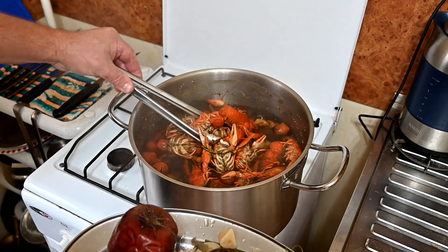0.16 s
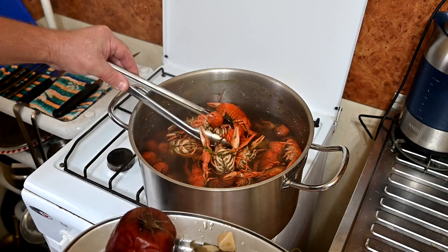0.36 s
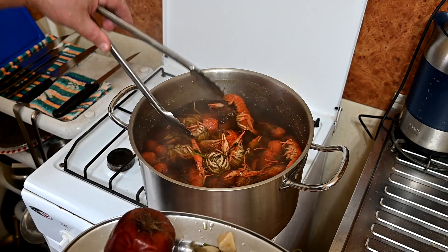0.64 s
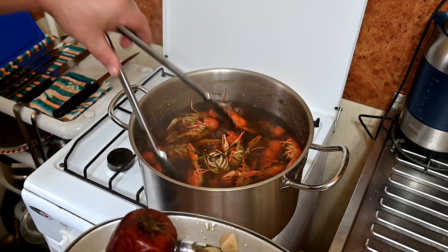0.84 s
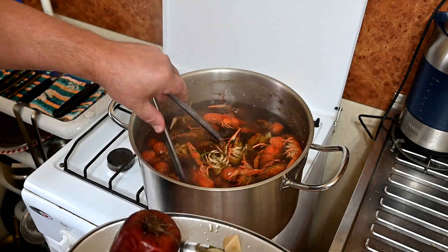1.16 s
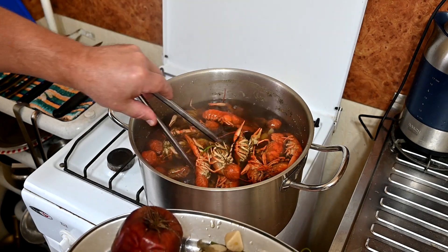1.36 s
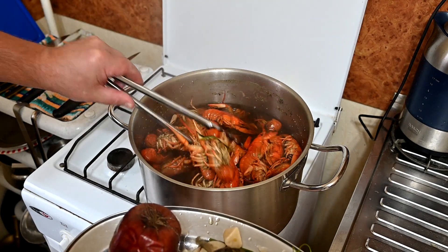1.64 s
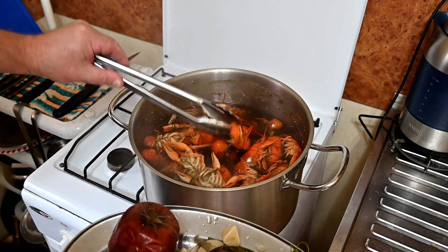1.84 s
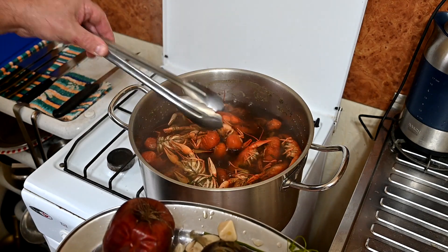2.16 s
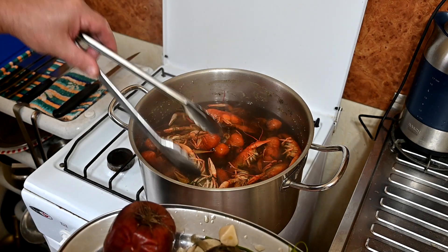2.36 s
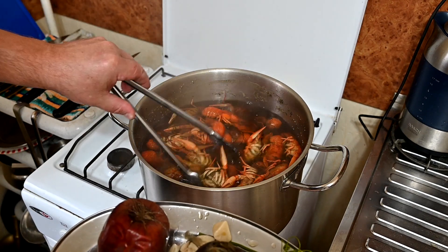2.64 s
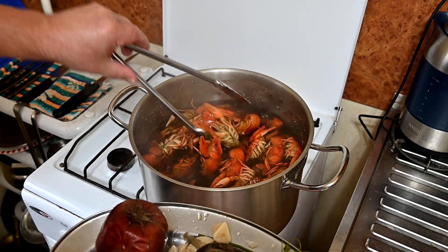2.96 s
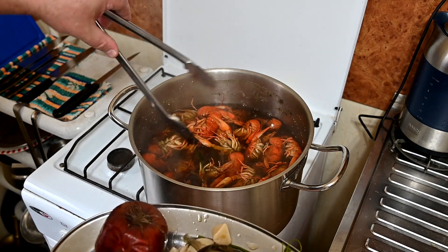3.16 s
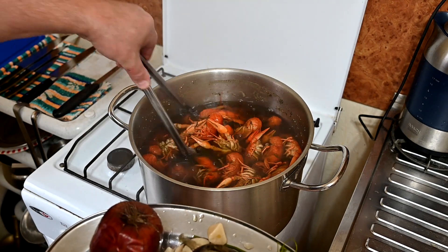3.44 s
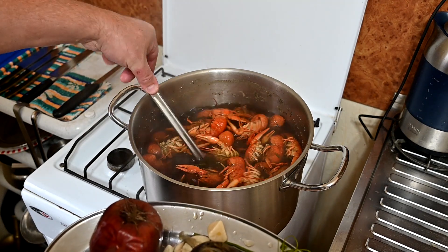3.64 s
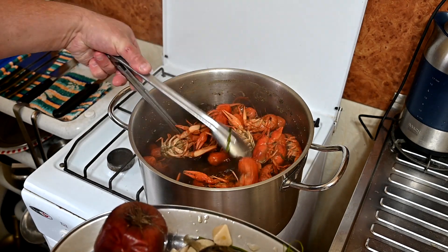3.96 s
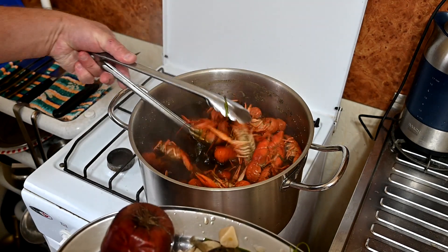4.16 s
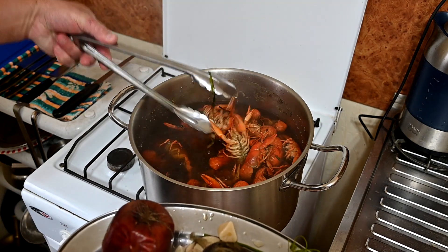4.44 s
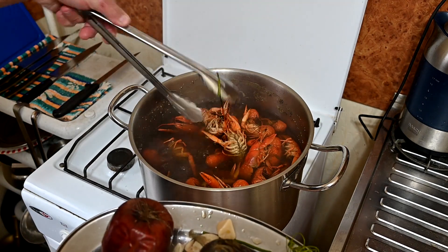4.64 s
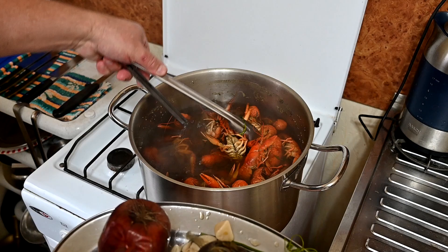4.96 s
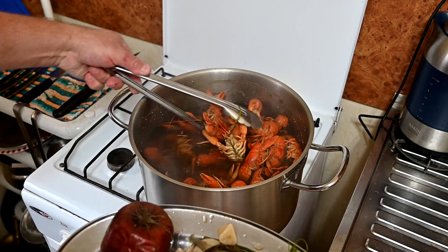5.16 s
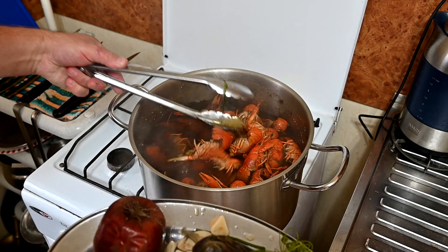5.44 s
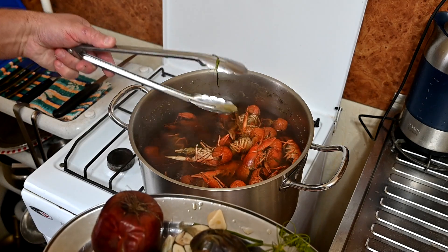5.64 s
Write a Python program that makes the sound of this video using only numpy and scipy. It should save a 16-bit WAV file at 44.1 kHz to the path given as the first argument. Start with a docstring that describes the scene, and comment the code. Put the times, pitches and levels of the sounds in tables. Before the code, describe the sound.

Close, wet crackling and clicking of crayfish shells stirred with metal tongs, broken by sloshing broth and sharp knocks on a steel pot.

```python
"""In a small kitchen, steel tongs fish boiled crayfish out of a big steel pot of broth.
Tongs and pot are sums of decaying modes struck by chattering contact; skids and clicks are noise bursts.
Crackling shells, squelching flesh and sloshing broth are swarms of tiny decaying tones under slow gains.
Bubbles and drips are gliding tones; the air in the pot and the stove under it are resonances driven by noise.
Echoes of the pot's walls and of the kitchen follow, over faint rumble and hiss."""
import sys
import numpy as np
from scipy import signal
from scipy.fft import rfft, irfft, next_fast_len
from scipy.io import wavfile
from scipy.ndimage import uniform_filter1d

SR = 44100
rng = np.random.default_rng(int(sys.argv[2]) if len(sys.argv) > 2 else 0)


def pcm_store(signal):
    """Save signal as 16-bit PCM."""
    levels = np.round(np.clip(np.atleast_2d(signal), -1, 1) * 32767)
    wavfile.write(sys.argv[1], SR, levels.astype(np.int16).T)


N = 256220
TIME = np.arange(N) / SR
GRAIN_TIME = TIME[:4096]
SLOW_TIME = np.arange(0, N / SR, .001)  # gains are drawn in steps of 1 ms

# Tongs at work in the heap: start [t/s], rise [t/s], length [t/s],
# relative crackle of shells [level/dB], relative wet squelch [level/dB]
STROKES = [(0, 0.0017, 0.18, -41, -41.5), (.405, 0.014, 0.052, -39, -41), (.885, 0.026, 0.26, -28.5, -41),
           (1.11, .01, 0.25, -36, -44), (1.56, 0.029, 0.062, -29, -25.5), (1.66, 0.012, .13, -32, -37),
           (1.825, 0.021, 0.02, -23.5, -27.5), (1.92, 0.023, 0.21, -45, -47.5),
           (2.49, 0.012, 0.55, -37.5, -45.5), (3.22, 0.0099, 0.11, -23, -39.5),
           (3.43, 0.0076, 0.046, -33, -36), (3.55, 0.014, 0.13, -32, -34.5),
           (3.83, 0.014, 0.23, -36, -36.5), (4.1, 0.01, 0.4, -35.5, -41.5), (4.71, 0.018, 0.25, -32.5, -40),
           (5.06, 0.046, 0.31, -35.5, -56), (5.34, 0.032, 0.1, -36.5, -37)]
# Broth pushed aside: start [t/s], rise [t/s], length [t/s],
# relative slosh [level/dB], relative boom of the air in the pot [level/dB]
SLOSHES = [(0, 0.0033, 0.018, -39.5, -42.5), (.3, 0.005, 0.01, -40.5, -52), (.93, 0.023, 0.14, -36.5, -72),
           (1.11, 0.015, 0.062, -25.5, -50), (1.56, 0.019, 0.033, -40.5, -60),
           (1.83, 0.012, 0.023, -44, -93), (2.5, 0.15, 0.34, -43.5, -61),
           (3.215, 0.0088, 0.034, -31.5, -45.5), (3.37, 0.034, 0.21, -41, -51.5),
           (3.565, 0.013, 0.048, -30, -37), (4.1, 0.0057, 0.042, -41.5, -34),
           (4.695, .025, 0.041, -31.5, -34), (5.05, 0.027, 0.044, -31, -38),
           (5.125, 0.019, 0.057, -29.5, -28.5)]
# Tongs dragged along the bottom of the pot: start [t/s], rise [t/s], length [t/s],
# stove top [level/dB], relative boom of the air in the pot [level/dB]
DRAGS = [(3.2, 0.45, 0.52, -44.5, -75), (3.55, .12, 0.32, -50, -46.5), (4.72, .12, 0.48, -54, -56)]
# Clearest snaps of shell: onset [t/s], relative snap [level/dB], relative low part [level/dB]
CLICKS = [(.195, -25.5, 9), (0.434, -26, -10), (.5305, -27.5, -30), (0.7733, -33.5, 2), (1.277, -20.5, -9),
          (1.3014, -19.5, -7), (1.5448, -19.5, 1), (1.569, -18, -2), (2.106, -34, -25), (2.4854, -21, -7),
          (2.7647, -23.5, -3), (2.8337, -19, 1.5), (2.9442, -22, -26), (2.963, -17.5, -8),
          (3.789, -20.5, -2), (4.127, -13, -16), (4.2384, -24.5, 17), (4.3807, -21.5, -32),
          (4.4776, -17.5, -13), (4.675, -26, 4), (5.241, -18, 11), (5.4538, -23, -3), (5.718, -37, -29)]
# Drips and gulps of air: onset [t/s], relative peak [level/dB], first and last pitch [f/Hz], length [t/s]
PLOPS = [(0.381, -19, 940, 1240, 0.015), (0.391, -29.5, 1300, 1750, 0.013),
         (2.158, -28.5, 2660, 1870, 0.0047), (2.998, -23, 2870, 3530, 0.0064),
         (4.008, -16.5, 3030, 3230, 0.0014), (4.101, -29, 1090, 740, 0.013),
         (5.198, -33.5, 786, 1000, .025), (5.206, -17, 1034, 1193, 0.043)]
# Tong tips skidding over steel and shell: onset [t/s], relative rasp [level/dB],
# relative low part [level/dB], nominal length [t/s]
SKIDS = [(0.454, -18, -4, 0.0067), (0.885, -18.5, -12, 0.016), (0.9165, -9.5, -43, 0.011),
         (0.97, -16.5, -7, 0.025), (0.996, -13, -9, 0.0086), (1.049, -17.5, -33, 0.021),
         (1.172, -17, -24, .029), (1.605, -18, -18, 0.032), (2.494, -14, -12, 0.0094),
         (2.707, -22, -21, 0.019), (2.863, -15, -8.5, 0.013), (3.01, -12.5, -30, 0.011),
         (3.298, -9.5, -9.5, 0.019), (3.43, -15.5, -14, .018), (3.546, -14, -1.5, 0.01),
         (3.824, -22, -1, 0.028), (3.864, -19, -3, 0.021), (4.141, -14, -13, .013),
         (4.4395, -14, -12, 0.0047), (4.902, -17, -24, 0.017), (4.9337, -18.5, -1.5, 0.024),
         (5.128, -12, -11, 0.004), (5.392, -21, 19, 0.0096)]
# Tongs striking the pot: onset [t/s], relative crack [level/dB], centre of the clack [f/Hz],
# relative clack [level/dB], relative ring of the tongs [level/dB], relative ring of the pot [level/dB]
KNOCKS = [(0.715, -48, 7800, -33, -60, -69), (1.1085, -8.5, 810, -17, -25, -17.5),
          (1.3588, -19.5, 1440, -29, -35, -53), (3.027, -33.5, 6300, -16.5, -37, -72),
          (3.2165, -8, 670, -19, -46, -31), (3.278, -35, 6600, -10.5, -57, -60),
          (3.573, -39, 358, -20, -31.5, -51), (4.0957, -24, 1240, -32, -38, -36),
          (4.694, -6.5, 2340, -15, -13.5, -30), (4.745, -20, 2900, -19.5, -42, -61),
          (5.0407, -12.5, 1860, -15.5, -23.5, -59), (5.52, -32, 2370, -23.5, -48, -68)]
# Modes of the tongs ringing freely: pitch [f/Hz], relative height [level/dB], decay by 60 dB [t/s]
TONGS_MODES = [(1593, -6, .12), (2188, -3, .16), (2238, -2, .18), (2321, -3, .14), (2860, -6, .22),
               (3318, -1, .22), (3342, -4, .2), (5150, -6, .13), (5190, -3, .18), (5688, -5, .2),
               (5895, -5, .18), (6362, -1, .22), (6520, -3, .26), (6980, -5, .17), (7390, -7, .15),
               (7880, -5, .17), (8445, -7, .17), (9055, -6, .14)]
# Modes of the filled pot: pitch [f/Hz], relative height [level/dB], decay by 60 dB [t/s]
POT_MODES = [(307, -27, 0.96), (572, 8, 0.45), (590, -11, 0.96), (672, 4, 0.35), (723, 9.5, 0.17),
             (942, -27, 0.6), (1078, 8.5, 0.27), (1753, 3, 0.16)]

# Spectrum of steel chattering on steel: [f/Hz], relative [level/dB]
CRACK = [(300, -26), (1000, 4.5), (2500, -4), (4200, 6.5), (6500, 9), (9000, 6.5), (10200, 0), (12000, 5),
         (15500, -12.5)]
# Spectrum of bright, hard shell: [f/Hz], relative [level/dB]
SHELL = [(800, -62), (2500, -28), (4000, -2.5), (6400, 2.5), (7800, -3), (8900, 0), (10200, -9.5),
         (12000, -7), (15500, -20.5)]
# Spectrum of wet flesh: [f/Hz], relative [level/dB]
SQUELCH = [(300, -12), (800, -6.5), (1500, 0), (2300, 0.5), (3300, 1.5), (4800, -6.5), (9000, -35)]
# Spectrum weighting of the bubbling broth: [f/Hz], relative [level/dB]
SLOSH = [(80, -11), (250, 4), (480, -1), (680, 2), (1050, 0.5), (1450, -8), (3000, 17.5)]
# Spectrum of deep broth pushed aside: [f/Hz], relative [level/dB]
SURGE = [(80, -13), (190, 4), (400, 7), (700, -21)]
# Spectrum of the quiet room: [f/Hz], relative [level/dB]
QUIET = [(25, -24), (45, 2), (80, -4.5), (150, -2.5), (300, -7), (600, -9), (1300, -15.5), (3000, -21),
         (8000, -19.5), (15500, -25)]
# Side signal against mid signal: [f/Hz], [level/dB]
WIDTH = [(2500, -85), (5000, -22.5), (8000, -16), (14000, -11.5)]
# Reverberation of the kitchen: [f/Hz], decay by 60 dB [t/s]
KITCHEN = [(100, 1), (400, 0.37), (1500, 0.31), (5000, 0.44), (9000, 0.23), (15000, 0.65)]

QUIET_DB = -54  # rms of the part common to both channels
STIRRED_DB = -11  # bubbling that goes with any stroke, against its crackle
ROCKING_DB = -28  # every slosh shakes the stove top too, against its own level
# bubbles below this pitch need a push that is deep enough to move the air in the pot
BIG_BUBBLE_HZ, DEPTH_POWER = 390, 0.17
STROKE_SAG_DB_PER_S, STROKE_FALL_DB_PER_S = 13.5, 136  # the shells give way, then settle
SLOSH_FALL_DB_PER_S, DRAG_FALL_DB_PER_S = 82, 19.5
EDGE_HZ = 15600  # upper band limit


def amp(db):
    """Level to amplitude: 20 dB is a factor of ten."""
    return 10 ** (np.asarray(db) / 20)


def evened(x):
    """Normalisation of the mean power: scales to rms 1."""
    return x / np.sqrt(np.mean(x ** 2) + 1e-20)


def steadied(x, size):
    """Running normalisation of power: holds the rms near 1 over stretches of size samples."""
    power = uniform_filter1d(uniform_filter1d(x ** 2, size), size)
    return x / np.sqrt(abs(power) + 1e-12)


def read(points, hz):
    """Linear interpolation of a table on a logarithmic frequency axis."""
    f, value = np.transpose(points)
    return np.interp(np.log(hz + 1), np.log(f + 1), value)


def add(mix, s, sound):
    """Superposition: mixes a sound in at second s."""
    part = mix[round(s * SR):][:len(sound)]
    part += sound[:len(part)]


def colour(x, points):
    """Linear filtering: multiplies the spectrum by a curve in dB."""
    size = next_fast_len(len(x))
    gain = amp(read(points, np.fft.rfftfreq(size, 1 / SR)))
    return irfft(rfft(x, size) * gain, size)[:len(x)]


def hiss(points, size=4096):
    """Random noise shaped by a spectrum, of rms 1."""
    return evened(colour(rng.standard_normal(size), points))


def resonate(x, hz, width_hz):
    """A single resonance, its bandwidth set by its damping."""
    return signal.lfilter(*signal.iirpeak(hz, hz / width_hz, SR), x)


def burst(noise, envelope):
    """Noise under an envelope, with the energy of that envelope."""
    return evened(noise * envelope) * np.sqrt(np.mean(envelope ** 2))


def ring(modes, damping=1, size=24000):
    """Modal decay from about rms 1; each point of contact weights the modes a little differently."""
    hz, db, t60 = np.transpose(modes)[:, :, None]
    t = TIME[:size]
    heights = amp(db + 1.5 * rng.standard_normal(hz.shape))
    decay = np.exp(-np.log(1000) * damping * t / t60)
    waves = decay * np.sin(2 * np.pi * (hz * t + rng.random(hz.shape)))
    onset = 1 - np.exp(-t / 0.00068)
    return (heights * waves).sum(0) / np.sqrt(np.sum(heights ** 2) / 2) * onset


def through(x, response):
    """Linear response: convolves with a response scaled to energy 1."""
    return signal.oaconvolve(x, response / np.linalg.norm(response))[:N]


def tail(t60s, delay_s):
    """Diffuse reverberation: dense random echoes, each band decaying exponentially at its own rate."""
    hz, t, z = signal.stft(rng.standard_normal(SR), SR, nperseg=256)
    decay = amp(-60 * t / read(t60s, hz)[:, None])
    echoes = signal.istft(z * decay, SR, nperseg=256)[1]
    return np.append(np.zeros(round(delay_s * SR)), echoes)


def swell(start, rise, length, fall_db_per_s, sag_db_per_s=0):
    """A force rises linearly, sags exponentially if asked, and is released after its length."""
    t = np.maximum(SLOW_TIME - start, 0)
    fall_db = fall_db_per_s * np.maximum(t - length, 0)
    return np.minimum(t / rise, 1) * amp(-sag_db_per_s * t - fall_db)


def efforts(rows, *shape):
    """Incoherent sources add in power: sums the swells into one gain curve per level column."""
    swells = np.array([swell(start, rise, length, *shape) for start, rise, length, _, _ in rows])
    levels = np.array(rows)[:, -2:].T
    gains = np.sqrt(amp(levels) ** 2 @ swells ** 2)
    return np.array([np.interp(TIME, SLOW_TIME, gain) for gain in gains])


def background(side_db=-2):
    """Partial coherence: room rumble alike in both channels, and hiss in opposite phase between them."""
    common = colour(rng.standard_normal(N), QUIET)
    own = colour(rng.standard_normal(N), QUIET)
    apart = colour(own, [(50, -20), (250, -16.5), (1500, -13.5)])
    return amp(QUIET_DB) / np.std(common) * (common + amp(side_db) * np.array([apart, -apart]))


def grains(lo_hz, hi_hz, per_s, cycles, spread_db, glide, clump_s, count=28):
    """A swarm of damped oscillators of unequal size, in clumps of one pitch; a positive glide rises."""
    out = np.zeros(N)
    for hz in np.geomspace(lo_hz, hi_hz, count) * rng.uniform(.95, 1.05, count):
        u = np.arange(0, 5, hz / cycles / SR)  # time in decay constants
        grain = np.exp(-u) * np.sin(2 * np.pi * cycles * (u + glide * u ** 2 / 2)) * hz
        draws = rng.random((int(per_s * N / SR / count), 5))
        sizes = amp(spread_db * np.minimum(-np.log(1 - draws[:, 0]), 4))
        # three grains of one size share a clump
        starts = (draws[:, 1:2] * N + draws[:, 2:] * clump_s * SR).astype(int)
        train = np.bincount((starts % N).ravel(), np.repeat(sizes, starts.shape[1]), N)
        out += signal.oaconvolve(train, grain)[:N]
    return out


def snaps(per_s=220):
    """Random impulses: sharp ticks of thin legs and feelers, of rms 1."""
    sizes = amp(rng.uniform(-14, 0, N))
    return evened(sizes * (rng.random(N) < per_s / SR))


def crackling(snaps_db=-1):
    """Friction of dry shells: a swarm of short, high tones with ticks among them."""
    rubs = grains(2500, 15000, per_s=1100, cycles=3.5, spread_db=4.3, glide=0, clump_s=.01)
    return steadied(colour(evened(rubs) + amp(snaps_db) * snaps(), SHELL), size=2000)


def squelching():
    """Bubble resonance in the wet pockets between shells: slightly rising tones."""
    pockets = grains(756, 6250, per_s=800, cycles=6.8, spread_db=3.5, glide=0.0044, clump_s=.012)
    return steadied(colour(pockets, SQUELCH), size=2000)


def sloshing(depth):
    """Bubble resonance in the broth: rising tones, of which the lowest need a deep push."""
    bubbles = grains(101.3, 1695, per_s=900, cycles=1.87, spread_db=0.5, glide=0.04, clump_s=.03)
    every = steadied(colour(bubbles, SLOSH), size=2000)
    big = signal.sosfiltfilt(signal.butter(3, BIG_BUBBLE_HZ, fs=SR, output="sos"), every)
    return every - (1 - depth) * big


def boom(hz, width_hz):
    """A narrow resonance kept going by irregular pushes, with rms near 1."""
    driven = resonate(rng.standard_normal(N), hz, width_hz)
    return steadied(resonate(driven, hz, 2 * width_hz), size=1500)


def booms(air, stove, air_db=-0.5, surge_db=-5):
    """Forced resonance: the shoved load moves deep broth, the air in the pot and the sheet-metal stove top."""
    hollow = amp(air_db) * boom(hz=294.5, width_hz=7.9) + amp(surge_db) * hiss(SURGE, size=N)
    return air * hollow + stove * boom(hz=76.5, width_hz=6)


def shell_noise(low_db, own_db=-4):
    """Impact spectrum of bright shell and duller wet flesh, with one resonance that differs each time."""
    hz = rng.uniform(3000, 9000)
    own = evened(resonate(hiss(SHELL), hz, hz / 12))
    return hiss(SHELL) + amp(low_db) * hiss(SQUELCH) + amp(own_db) * own


def taps(shells, per_s=14, level_db=12, spread_db=8, low_db=-9, fall_s=0.0028):
    """Chance impacts of shell on shell, scaled by the stroke that causes them."""
    out = np.zeros(N)
    for when, size in rng.random((int(per_s * N / SR), 2)):
        at = int(when * N)
        tap = burst(shell_noise(low_db), np.exp(-GRAIN_TIME / fall_s))
        add(out, at / SR, shells[at] * amp(level_db - spread_db * size) * tap)
    return out


def clicks(level_db=-4, fall_s=0.0038):
    """Single impacts of shell against shell or tongs: noise that decays exponentially."""
    out = np.zeros(N)
    for s, db, low_db in CLICKS:
        snap = burst(shell_noise(low_db), np.exp(-GRAIN_TIME / fall_s))
        add(out, s, amp(db + level_db) * snap)
    return out


def plops(level_db=2, damping=1.8):
    """Bubble resonance near the surface: a brief tone whose pitch glides up or down."""
    out = np.zeros(N)
    for s, db, first_hz, last_hz, length in PLOPS:
        u = np.linspace(0, 1, int(max(length, .002) * SR))  # at least 2 ms
        tone = np.sin(2 * np.pi * np.cumsum(first_hz + (last_hz - first_hz) * u) / SR)
        envelope = np.exp(-damping * u) * signal.windows.tukey(len(u), .3)
        add(out, s, amp(db + level_db) * tone * envelope)
    return out


def skids(level_db=-9.0, slip_s=0.0039, spread=2.41):
    """Stick-slip friction: a tip slips at irregular intervals and makes a short, rough rasp."""
    out, t = np.zeros(N), GRAIN_TIME
    for s, db, low_db, length in SKIDS:
        u = spread * t / max(length, .004)
        slips = np.cumsum(rng.exponential(slip_s, size=200))
        since = t - np.append(0, slips)[np.searchsorted(slips, t)]  # time since the last slip
        rasp = .4 + 1.3 * np.exp(-since / .0011)
        add(out, s, amp(db + level_db) * burst(shell_noise(low_db) * rasp, u * np.exp(1 - u)))
    return out


def knocks(contact_s=0.0027, fall_s=0.0035, clack_s=0.0039, pressed_db=7, free_db=-2):
    """Impact of steel on steel: contact chatters, a dull clack decays, and the modes of both bodies ring."""
    out, t = np.zeros(N), GRAIN_TIME
    chatter = np.exp(-np.maximum(t - contact_s, 0) / fall_s)
    for s, crack_db, hz, clack_db, tongs_db, pot_db in KNOCKS:
        add(out, s, amp(crack_db) * burst(hiss(CRACK), chatter))
        thud = resonate(rng.standard_normal(len(t)), hz, min(.7 * hz, 600))
        clack = resonate(thud, hz, .7 * hz)
        add(out, s, amp(clack_db) * burst(clack, np.exp(-t / clack_s)))
        # pressed against the pot the tongs lose most of their ring at once; a little rings on freely
        pressed = amp(pressed_db) * ring(TONGS_MODES, damping=4.6)
        clang = pressed + amp(free_db) * ring(TONGS_MODES)
        add(out, s, amp(tongs_db) * clang + amp(pot_db) * ring(POT_MODES))
    return out


def scene(tongs_db=-21, inside_db=-7, room_db=-7, inside_t60=0.053):
    """Excitation, sympathetic ringing of the tongs, and reflection by the pot's walls, then the kitchen."""
    shells, wet = efforts(STROKES, STROKE_FALL_DB_PER_S, STROKE_SAG_DB_PER_S)
    slosh, sloshed_air = efforts(SLOSHES, SLOSH_FALL_DB_PER_S)
    drag, dragged_air = efforts(DRAGS, DRAG_FALL_DB_PER_S)
    air = np.hypot(sloshed_air, dragged_air)
    stove = np.hypot(drag, amp(ROCKING_DB) * slosh)
    bubbling = np.hypot(slosh, amp(STIRRED_DB) * shells)
    depth = np.minimum(air / (bubbling + 1e-9), 1) ** DEPTH_POWER

    crackle = amp(-2) * shells * crackling()
    broth = wet * squelching() + amp(-1) * bubbling * sloshing(depth)
    rubbed = crackle + taps(shells) + clicks() + skids()
    # light contacts reach mostly the high modes
    singing = through(rubbed, colour(ring(TONGS_MODES), SHELL))
    near = knocks() + rubbed + amp(tongs_db) * singing + broth + plops()
    near = near + amp(inside_db) * through(near, tail([(1000, inside_t60)], delay_s=0.001544))
    echoed = near + amp(room_db) * through(near, tail(KITCHEN, delay_s=.007))
    mid = amp(-3.0) * echoed + booms(air, stove)
    # two close microphone ports differ in phase in the treble
    quadrature = signal.hilbert(mid, next_fast_len(N))[:N].imag
    side = colour(quadrature, WIDTH)
    return np.array([mid + side, mid - side]) + background()


def record(dry):
    """Saturation and band limitation: clips at full scale, then removes what lies above EDGE_HZ."""
    band = signal.firwin(201, EDGE_HZ, window=("kaiser", 8), fs=SR)
    return signal.oaconvolve(np.clip(dry, -1, 1), band[None], "same")


dry = scene()
out = record(dry)
pcm_store(out)
```